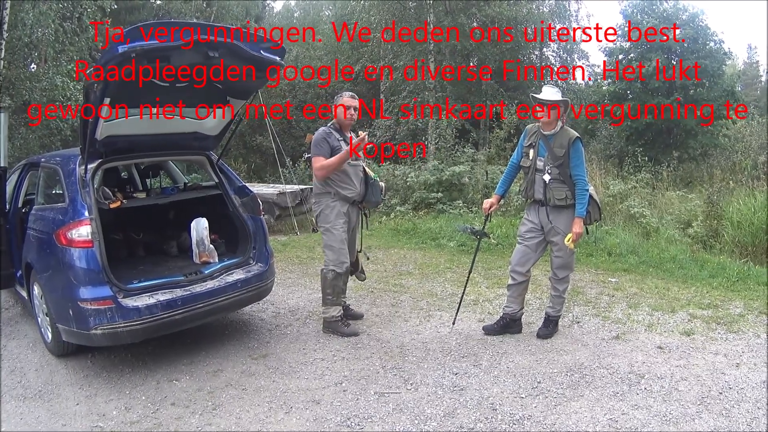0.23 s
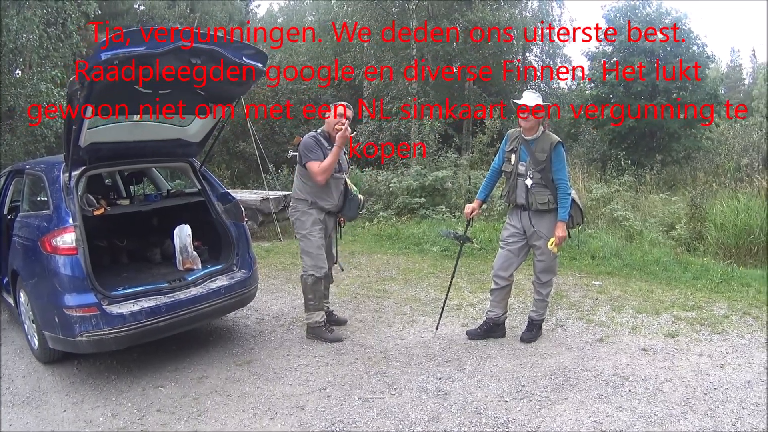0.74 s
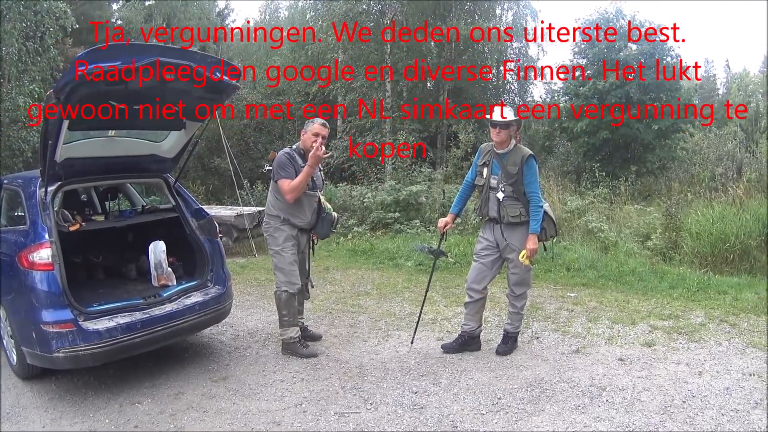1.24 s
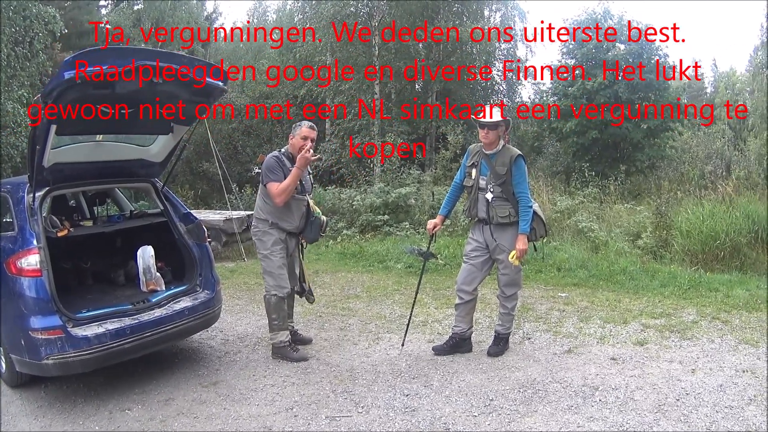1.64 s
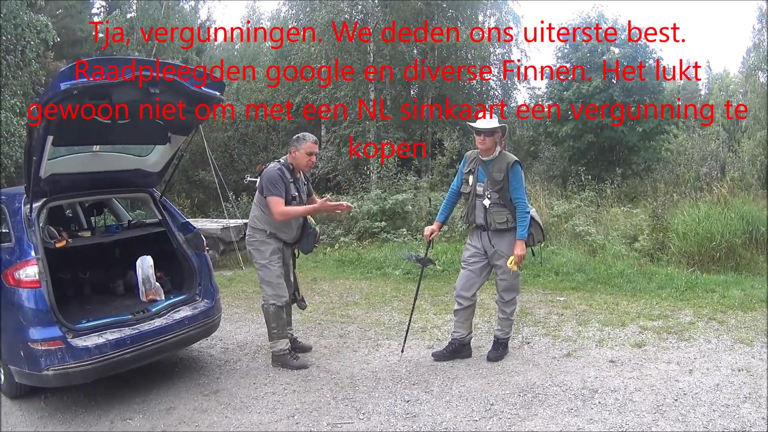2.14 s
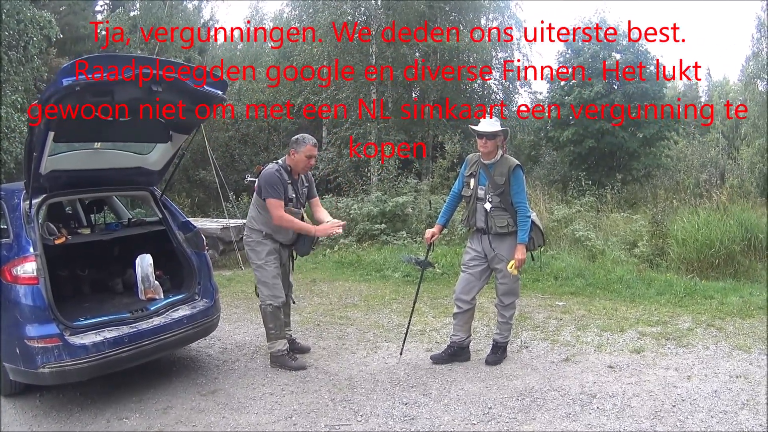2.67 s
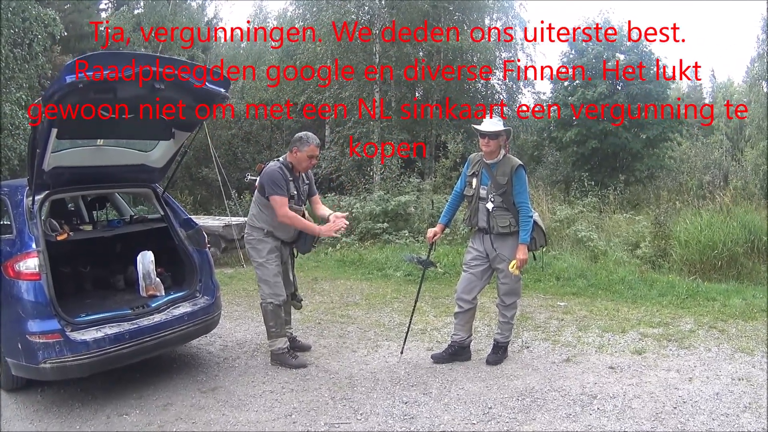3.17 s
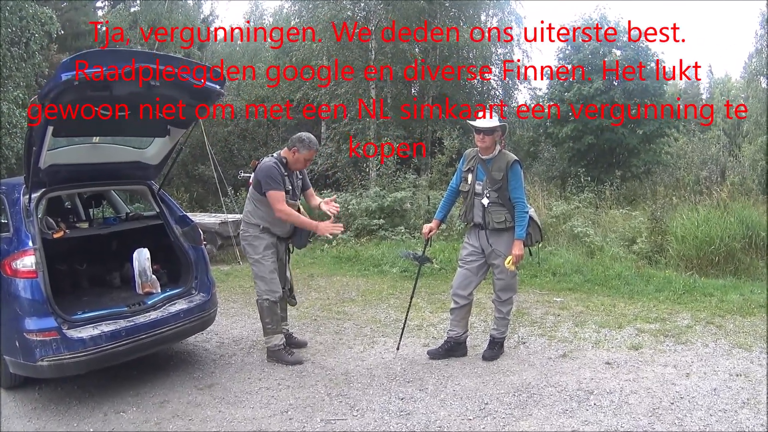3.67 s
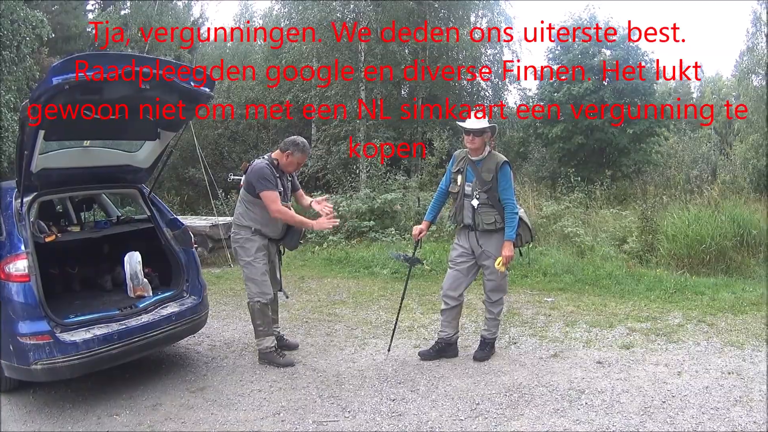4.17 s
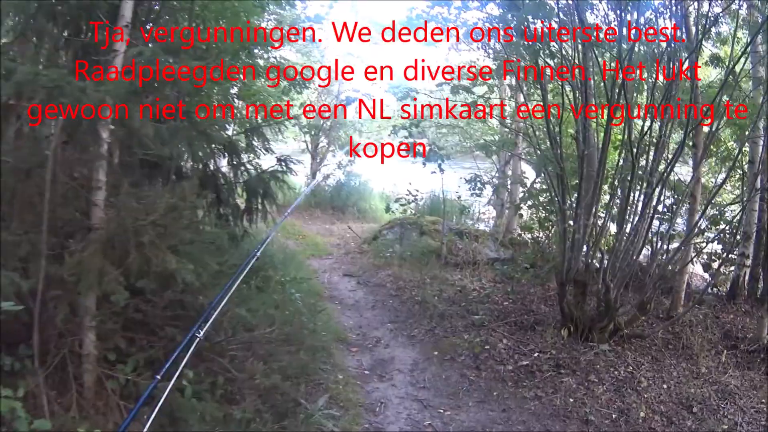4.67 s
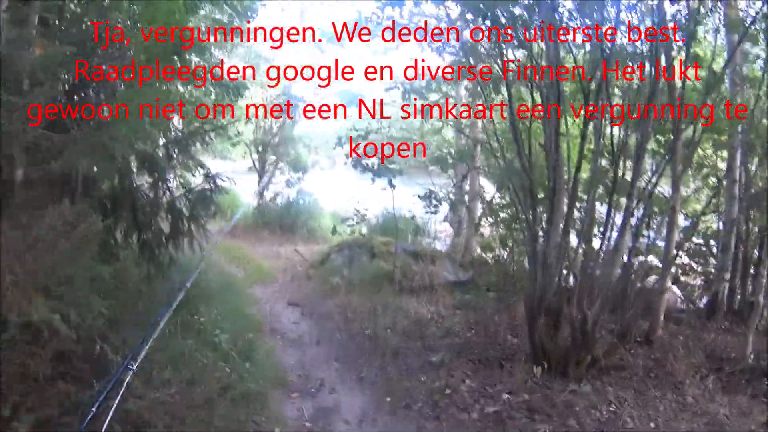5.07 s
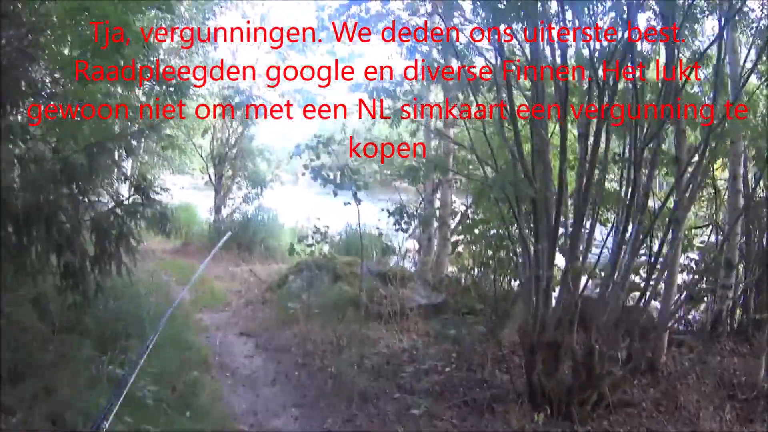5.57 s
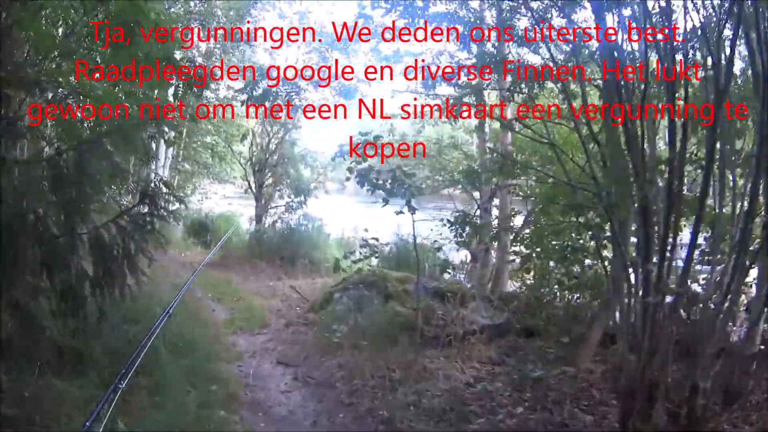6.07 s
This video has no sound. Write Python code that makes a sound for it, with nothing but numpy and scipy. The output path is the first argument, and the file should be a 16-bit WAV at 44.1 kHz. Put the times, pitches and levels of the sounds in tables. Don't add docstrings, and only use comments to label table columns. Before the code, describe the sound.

Hands slap and knock on a small plastic housing with clicks, creaks and rustling, while a river rushes steadily in the background outdoors.

```python
import sys
import numpy as np
from scipy import signal
from scipy.io import wavfile

SR = 44100
rng = np.random.default_rng(int(sys.argv[2]) if len(sys.argv) > 2 else 0)


def wrap_up_sound(samples):
    columns = np.atleast_2d(samples).T
    tamed = np.clip(columns, -1, 1)
    steps = np.round(tamed * 32767).astype(np.int16)
    wavfile.write(sys.argv[1], SR, steps)


def elevation(decibels):
    levels = np.asarray(decibels, float)
    return 10 ** (levels / 20)


N = 278271
OPPOSITE = np.array([[1], [-1]])


def rms_one(x):
    return x / np.sqrt(np.mean(x ** 2) + 1e-20)


def over_time(points):
    times, levels = np.transpose(points)
    return np.interp(np.arange(N) / SR, times, levels)


def at_hz(points, hz):
    point_hz, values = np.transpose(points)
    return np.interp(np.log(hz), np.log(point_hz), values)


def band(x, low_hz, high_hz, count=1):
    sos = signal.butter(2, [low_hz, min(high_hz, .45 * SR)], "band", fs=SR, output="sos")
    return signal.sosfilt(np.tile(sos, (count, 1)), x)


def steep(x, low_hz, high_hz):
    return band(x, low_hz, high_hz, count=2)


def drift(rate_hz):
    r = np.exp(-80 * np.pi * rate_hz / SR)
    white = rng.standard_normal(N // 40 + 2002)
    slow = signal.lfilter([1], [1, -2 * r, r * r], white)[2000:]
    return np.interp(np.arange(N) / 40, np.arange(len(slow)), rms_one(slow))


def ring(x, hz, t60):
    r = elevation(-60 / (t60 * SR))
    w = 2 * np.pi * hz / SR
    return signal.lfilter([0, np.sin(w)], [1, -2 * r * np.cos(w), r * r], x)


def contact_noise(count, length, wide):
    n = rng.standard_normal((count, 2, length))
    return n[:, :1] + wide * n[:, 1:] * OPPOSITE


def burst(noise, t60, rise_s, snap=0.0, click=0.0):
    t = np.arange(noise.shape[-1]) / SR
    rise_s = np.clip(rise_s, .0002, .015)
    fall = elevation(-60 * np.maximum(t - rise_s, 0) / np.clip(t60, .004, .9))
    lean = 1 + noise[:, :1] - noise[:, :1].mean()
    contact = click * lean * (np.arange(len(t)) == int(rise_s * SR))
    return noise * (1 - np.exp(-(t / rise_s) ** 2)) * (fall + snap * fall ** 5) + contact


def add(out, s, sound, peak_db):
    i = int(s * SR)
    sound = sound[:, :N - i] * elevation(peak_db) / np.max(np.abs(sound.mean(axis=0)))
    out[:, i:i + sound.shape[1]] += sound


def housing(x):
    # (frequency [Hz], width [Hz], lift [dB])
    cavity_modes = [(1320, 119, 12.5), (1640, 320, 4), (2400, 306, 7), (4600, 1200, 2)]
    out = x
    for hz, width_hz, db in cavity_modes:
        r = np.exp(-np.pi * width_hz / SR)
        numerator = (1 - r * r) / 2 * np.array([1, 0, -1])
        denominator = [1, -2 * r * np.cos(2 * np.pi * hz / SR), r * r]
        out = out + (elevation(db) - 1) * signal.lfilter(numerator, denominator, out)
    return out


def slaps():
    # (time [s], pocket peak [dB], t60 [s], airy top [dB re peak], bright crack [dB re peak])
    slap_events = [(0.2638, -24.5, 0.058, -52, -0.5), (2.365, -19, 0.019, -14.5, 3.5),
                   (2.7118, -25.5, 0.014, -11, 7.5), (2.966, -19, 0.013, -19, -8),
                   (3.1965, -11, 0.017, -18, -5), (3.4087, -17, 0.026, -16, -4.5),
                   (3.6521, -12.5, 0.0067, -17, -4), (3.891, -12.5, 0.02, -16.5, -1.5),
                   (4.0327, -14.5, 0.031, -50, -12.5), (4.148, -10, 0.013, -24.5, -6.5),
                   (4.4177, -21, 0.016, -13.5, 0)]
    pocket_hz = [2450, 2450, 2750, 2510, 2810, 2700, 2600, 2860, 2470, 2910, 2630]
    # (delay [s], level [dB])
    reflections = [
        (.006, -20),
        (.013, -22),
        (0.019, -29.5),
    ]
    trees_t60 = 0.67
    out, tails = np.zeros((2, N)), np.zeros((2, N))
    noise = contact_noise(len(slap_events), 4000, wide=0.12)
    scatter = contact_noise(len(slap_events), 16000, wide=0.27)
    for (s, db, t60, top_db, bright_db), hz, n, far in zip(slap_events, pocket_hz, noise, scatter):
        crack = burst(n, 1.9 * t60, 0.0012, snap=3.0, click=11.0)
        pocket = steep(crack, 0.896 * hz, 1.09 * hz)
        add(out, s, pocket + 0.41 * band(crack, 1950, 3110), db)
        add(out, s, steep(crack, 3050, 6210), db + bright_db + 7.5)
        air = burst(n, 1.17 * t60, 0.0017, click=3.7)
        add(out, s, steep(air, 12200, 19000) + 1.93 * band(air, 7360, 9300), db + top_db + 4.5)
        brush = burst(n[:, ::-1], .02, .004)
        add(out, s - .004, steep(brush, 1800, 7000), db + bright_db - 12)
        tail = burst(far, trees_t60, 0.0024, snap=1.7)
        tail = steep(tail, 3000, 7000) + 0.36 * steep(tail, 840, 1520)
        add(tails, s, tail, db + max(bright_db, -6) - 19)
        high_tail = burst(far, 0.54 * trees_t60, .003)
        add(tails, s, steep(high_tail, 5800, 14500), db + top_db - 23.5)
    direct = out.copy()
    for delay_s, db in reflections:
        lag = int(delay_s * SR)
        out[:, lag:] += elevation(db) * band(direct[::-1, :-lag], 800, 7000)
    return out + housing(tails)


def body_contacts(events, rise_s, rough, snap, ringing):
    out = np.zeros((2, N))
    noise = contact_noise(len(events), 4000, wide=0.12)
    for (s, db, hz, t60, dull_db, bright_db), n in zip(events, noise):
        contact = burst(n, rough * t60, rise_s, snap, click=7.6 * snap)
        mode = ring(contact, hz, np.clip(ringing * t60, .004, .2))
        lean = elevation(-2.0 * np.log2(hz / 1150) * OPPOSITE)
        add(out, s, lean * steep(mode, 0.58 * hz, 1.49 * hz), db)
        shake = burst(n[::-1], 1.18 * t60, rise_s, snap)
        add(out, s, steep(shake, 374, 1256) * elevation(0.6 * OPPOSITE), db + dull_db - 5.0)
        add(out, s, steep(shake, 1490, 2060), db + bright_db + 1.0)
    return out


def blows_and_knocks():
    # (time [s], peak [dB], main ring [Hz], dull part [dB re peak], bright part [dB re peak])
    blows = [(0.265, -17, 1477, -7, -25), (2.365, -20, 1330, -5, -6), (2.712, -20, 1730, -19, -8),
             (2.967, -23.5, 1350, -3.5, 0.5), (3.412, -19.5, 1226, 1, -9), (3.894, -14, 1357, 3, -17),
             (4.0344, -8.5, 1466, -4, -10.5), (4.215, -25.5, 1360, 0, -20), (4.42, -30, 1260, 8, 3),
             (5.0046, -6.5, 1275, -1.5, -11.5), (6.242, -22, 722, -20, -2), (6.263, -9, 1580, -4, -29)]
    # (time [s], peak [dB], main ring [Hz], dull part [dB re peak])
    soft_knocks = [
        (0.725, -36.5, 1760, 4),
        (4.593, -34, 816, -4),
        (5.509, -31.5, 1440, 4),
        (5.682, -34, 1320, 7),
        (6.06, -32, 1400, 8.5),
        (6.222, -30, 640, -16),
    ]
    events = [(s, db, hz, .05, dull_db, bright_db) for s, db, hz, dull_db, bright_db in blows]
    events += [(s, db, hz, 56 / hz, dull_db, -5) for s, db, hz, dull_db in soft_knocks]
    return body_contacts(events, rise_s=0.00061, rough=0.99, snap=2.4, ringing=0.5)


def rubs():
    # (time [s], peak [dB], main ring [Hz], dull part [dB re peak])
    scrapes = [(0.779, -43, 1340, 2), (0.953, -36.5, 1280, -12), (0.985, -39, 1280, -6),
               (1.75, -39, 1630, -18), (2.41, -24.5, 1330, 1), (2.435, -21.5, 1320, -6),
               (2.52, -36, 1470, -2), (3.004, -43.5, 840, 3), (3.825, -45, 597, 12.5),
               (4.272, -53, 1330, 18.5), (4.63, -38, 849.3, 0), (4.93, -26.5, 1050, -27)]
    events = [(s, db, hz, 60 / hz, dull_db, -9) for s, db, hz, dull_db in scrapes]
    return body_contacts(events, rise_s=0.0014, rough=1.0, snap=0, ringing=0.69)


def thumps():
    # (time [s], peak [dB], centre [Hz])
    bumps = [(0.714, -39, 149), (0.81, -54, 172), (0.875, -33, 230), (1.665, -39, 380), (1.764, -44.5, 167),
             (2.06, -52, 241), (2.188, -31, 218), (2.402, -28, 416), (2.439, -33.5, 151),
             (2.606, -41.5, 134), (2.955, -38, 390), (3.188, -45.5, 125), (3.278, -52, 340),
             (3.402, -30.5, 440), (3.473, -33.5, 177), (3.473, -45, 323.8), (1.4, -52, 260),
             (2.52, -38.5, 304), (3.783, -44, 170), (3.88, -22, 460), (4.036, -25, 450),
             (4.217, -37.5, 450), (4.414, -35, 390), (4.582, -41, 474), (5.199, -54, 150),
             (4.968, -35, 161), (5.137, -45, 160), (5.468, -39.5, 171), (5.502, -35, 133),
             (5.578, -41, 177), (5.675, -42, 148), (6.058, -45, 147), (6.209, -34.5, 154)]
    # (time [s], peak [dB], centre [Hz])
    pushes = [(0.714, -51, 94.2), (0.881, -67, 88), (1.758, -51, 86.1), (2.061, -53, 91.54),
              (2.191, -70, 94.2), (2.405, -58, 59.2), (2.549, -50, 70.0), (3.191, -55, 94.2),
              (3.465, -57, 94.2), (3.779, -64, 94.2), (4.412, -56, 70.04), (4.753, -51, 94.2),
              (4.919, -47, 94.2), (5.5, -49, 94.2), (5.637, -50.5, 94.2), (5.764, -53, 94.2),
              (5.902, -55, 88.8), (6.186, -57, 94.2)]
    events = bumps + pushes
    out = np.zeros((2, N))
    for (s, db, hz), n in zip(events, contact_noise(len(events), 8000, wide=0.1)):
        push = burst(n, 1.17 * 0.066, 0.0019)
        add(out, s + 0.00718, band(push, 0.67 * hz, 1.65 * hz), db)
    return out


def shell(clicks, hz, upper_db, sides):
    # (frequency [Hz], t60 [s], level [dB])
    shared_modes = [(743, 0.0026, -32), (1330, 0.02, -10.5), (1760, 0.0099, -0.5)]
    soft = signal.sosfilt(signal.butter(2, 2300, fs=SR, output="sos"), clicks)
    modes = [(hz, 0.015, -upper_db)] + shared_modes
    out = 0
    for (mode_hz, t60, db), side in zip(modes, sides - sides.mean()):
        out = out + elevation(db + 3.1 * side * OPPOSITE) * ring(soft, mode_hz, np.clip(t60, .002, .1))
    return steep(out, 660, 2530)


def taps():
    # (time [s], peak [dB], main ring [Hz], main ring below upper modes [dB])
    thin_taps = [(0.831, -28, 900, 12), (0.884, -30.5, 830, -18), (1.768, -30, 1330, -12),
                 (1.845, -23.5, 1280, 3), (1.859, -42, 1380, -1.5), (1.881, -23, 1310, 5),
                 (1.899, -26, 1320, 3), (1.913, -30, 1230, 10), (1.924, -35, 1280, -3),
                 (1.937, -42, 1350, -1.5), (2.201, -21.5, 920, -11), (2.538, -13.5, 1340, 14),
                 (2.599, -23.5, 1450, 11), (2.662, -42, 1390, -9), (2.697, -32.5, 1330, -4),
                 (3.59, -29.5, 1360, 4), (3.668, -27.5, 1320, -5), (3.734, -30, 1270, 10),
                 (3.799, -25, 1310, 11), (4.701, -23.5, 1320, 5), (4.856, -19.5, 1330, 8),
                 (4.93, -22.5, 1050, 7), (4.961, -20, 1230, -6), (5.106, -16, 1310, 3),
                 (5.117, -17, 1550, 3), (5.139, -4, 1010, 6), (5.177, -12, 954, 3), (5.187, -12, 1000, 1.5),
                 (5.238, -24.5, 1330, 5), (5.573, -31, 1270, 9), (5.883, -29, 1300, 5),
                 (5.94, -11.5, 984, 1.5), (5.95, -17.5, 1320, 4), (5.981, -27, 1320, 7),
                 (5.986, -29, 1390, 2), (6.001, -23, 1430, 4), (6.015, -31, 1350, 10),
                 (6.147, -28.5, 1330, 1), (6.243, -9.5, 670, -10), (6.262, -4, 1290, 0),
                 (6.265, -10, 1260, -8),
                 (5.238, -28, 1290, 10),
        (5.357, -28, 1380, 6),
        (5.51, -35, 1320, 6),
        (5.539, -20, 1320, 15),
        (5.573, -27, 1280, -6),
        (5.678, -33, 1320, 2),
        (5.723, -26, 1500, -1.5),
        (5.737, -30, 1300, 16),
        (5.87, -25.5, 1330, 3),
        (5.882, -27, 1250, 14),
    ]
    events = thin_taps
    impulse = np.eye(1, 1500)[0]
    out = np.zeros((2, N))
    for (s, db, hz, upper_db), sides in zip(events, rng.standard_normal((len(events), 4))):
        add(out, s + 0.00081, shell(impulse, hz, upper_db, sides), db)
    return out


def creaks():
    # (time [s], length [s], peak [dB], slip rate [1/s], main ring [Hz])
    creak_events = [(0.83, 0.021, -33.5, 430, 840), (0.898, 0.02, -31.5, 300, 850),
                    (0.922, .016, -34.5, 350, 1220), (1.656, 0.037, -38.5, 360, 830),
                    (1.735, 0.043, -29, 520, 800), (1.812, 0.023, -34.5, 380, 1310),
                    (2.476, 0.02, -25.5, 317, 1090), (2.567, 0.019, -28, 290, 1220),
                    (2.615, 0.013, -26.5, 530, 1420), (4.975, 0.027, -23, 286, 1180),
                    (5.009, 0.012, -26, 440, 810), (5.039, 0.0091, -26, 410, 836),
                    (5.053, 0.0064, -25.5, 380, 700), (5.147, 0.013, -12, 920, 1015),
                    (6.265, 0.018, -12.5, 410, 740)]
    out = np.zeros((2, N))
    draws = rng.standard_normal((len(creak_events), 2, 60))
    for (s, length, db, per_s, hz), (gaps, sizes) in zip(creak_events, draws):
        t = np.cumsum(np.exp(70 / per_s * gaps) / per_s) - 1 / per_s
        within = t < length
        slips = np.zeros(4000)
        slips[(t[within] * SR).astype(int)] = elevation(3.0 * sizes - 8.2 * t / length)[within]
        add(out, s, shell(slips, hz, -6.5, sizes[-4:]), db)
    return out


def rings():
    # (time [s], peak [dB], frequency [Hz], t60 [s])
    hollow_parts = [(0.2667, -12, 1520, .045), (0.2802, -25, 1300, 0.074), (4.0405, -25, 520, .09),
                    (4.0505, -32, 2000, .03), (4.1592, -27, 2880, .035), (2.7135, -20, 1900, .02),
                    (4.0602, -31, 440, 0.053), (4.0485, -28, 950, .04), (0.9005, -35, 300, .04),
                    (0.8845, -32, 1100, .015), (0.9065, -33, 1000, .02), (6.2425, -22, 570, .04),
                    (3.8305, -38, 900, .04), (4.4195, -26, 480, .04), (4.217, -38.5, 530, 0.12),
                    (5.006, -21.5, 780, 0.033), (5.018, -28, 780, .04), (5.041, -27, 790, .04),
                    (5.141, -13.5, 960, .045), (5.152, -18, 1760, 0.03), (5.161, -26, 1600, 0.017),
                    (5.141, -10.5, 1790, 0.034), (5.201, -21, 1800, 0.018), (3.892, -16, 1280, 0.034),
                    (2.366, -20.5, 2380, 0.032), (3.418, -27, 1400, 0.054), (3.198, -27, 1380, .03),
                    (3.655, -30, 1346, .025), (3.653, -18, 2310, 0.017), (0.2705, -31.5, 1200, .3),
                    (3.8905, -15, 2390, 0.023), (4.214, -35, 3700, .012), (4.216, -34, 3100, .015),
                    (6.263, -16.5, 1020, 0.059)]
    out = np.zeros((2, N))
    for (s, db, hz, t60), n in zip(hollow_parts, contact_noise(len(hollow_parts), 6000, wide=0.12)):
        mode = ring(burst(n, 0.008, 0.001, click=6.1), hz, np.clip(t60, .005, .2))
        add(out, s, band(mode, 0.72 * hz, 1.43 * hz), db)
    return out


def latch():
    # (frequency [Hz], t60 [s], peak [dB])
    metal_modes = [(1210, 0.33, -34), (1330, 0.053, -23), (1464, 0.021, -13.5), (2350, 0.048, -21.5),
                   (4290, 0.1, -35), (5640, 0.069, -33), (5940, 0.049, -27.5)]
    struck_s = .2655
    out = np.zeros((2, N))
    n = contact_noise(1, 16000, wide=0.24)[0]
    strike = burst(n, 0.015, 0.0014, click=1.7)
    for hz, t60, db in metal_modes:
        add(out, struck_s, band(ring(strike, hz, t60), 0.86 * hz, 1.04 * hz), db)
    sizzle = burst(n, 0.44, 0.0091)
    add(out, struck_s, steep(sizzle, 3950, 4700) + steep(sizzle, 5100, 6600), -37)
    return out


def cracks(events, rise_s, width):
    out = np.zeros((2, N))
    noise = contact_noise(len(events), 3000, wide=0.23)
    for (s, db, hz, t60, top_db), n in zip(events, noise):
        crack = burst(n, 5.0 * t60, rise_s, snap=2.6, click=4.6)
        broad = steep(crack, hz / width, max(5000, hz * 1.476))
        add(out, s, broad + 1.5 * steep(crack, 0.884 * hz, 1.14 * hz), db)
        air = burst(n, 1.0 * t60, rise_s, click=2.3)
        add(out, s, steep(air, 11000, 22000) + 0.89 * band(air, 8300, 9800), db + top_db + 4.5)
    return out


def gear():
    # (time [s], peak [dB])
    buckle_ticks = [(0.4492, -44), (0.5302, -33.5), (0.7027, -38.5), (0.8305, -45), (1.475, -34),
                    (1.8147, -37), (1.8254, -47), (1.8457, -36.5), (1.858, -40), (1.881, -38),
                    (1.8996, -42), (2.539, -27.5), (2.602, -37.5), (4.7, -35), (4.9427, -33), (4.997, -31),
                    (5.095, -16), (5.139, -29), (5.4276, -32.5), (5.951, -32), (6.1341, -29.5),
                    (6.1767, -40), (6.232, -29.5)]
    # (time [s], peak [dB], centre [Hz], airy top [dB re peak])
    rod_clicks = [(2.816, -31, 5500, -33), (3.113, -29.5, 5640, -22), (3.284, -29, 6200, -24),
                  (3.7797, -36, 6300, -19), (4.0144, -28, 5900, -20), (4.117, -43, 6300, -19),
                  (4.282, -23.5, 5700, -48), (4.505, -32, 5760, -27), (5.0704, -13, 4630, -30),
                  (5.1055, -26, 4140, -12), (5.5666, -27, 5230, -13), (6.0406, -39, 4970, -8),
                  (6.206, -30, 5100, -15), (5.331, -43, 4200, -25), (5.46, -35, 4900, -25),
                  (5.533, -39, 3800, -25), (5.667, -39, 4000, -27), (5.699, -31, 4600, -25),
                  (5.238, -35, 4550, -23), (2.446, -33, 3640, -25), (2.421, -27, 4800, -25),
                  (4.856, -35, 4830, -25)]
    # (time [s], peak [dB], centre [Hz], t60 [s], airy top [dB re peak])
    scuffs = [(2.4035, -29, 2190, 0.0081, -28), (2.409, -19.5, 2600, 0.011, -23),
              (2.412, -17.5, 2400, 0.021, -32), (2.4345, -18.5, 2500, 0.0064, -20),
              (2.439, -19, 2350, 0.02, -25), (1.973, -37, 2630, 0.006, -30),
              (5.071, -16.5, 2300, 0.006, -44), (5.0855, -17, 2700, 0.005, -17),
              (5.1158, -19, 2820, 0.0052, -54), (5.2, -18.5, 2790, 0.0068, -25),
              (5.3572, -27, 2300, 0.017, -47), (5.5398, -24, 2340, 0.0035, -35),
              (5.678, -21, 2620, 0.0031, -18), (5.736, -17, 2110, 0.0083, -26)]
    small = [(s, db, 4570, 0.0024, -29) for s, db in buckle_ticks]
    small += [(s, db, hz, 0.0039, top_db) for s, db, hz, top_db in rod_clicks]
    return cracks(small, rise_s=0.000674, width=1.7) + cracks(scuffs, rise_s=0.00077, width=1.34)


def swishes():
    # (time [s], peak [dB], t60 [s])
    sleeves = [
        (2.953, -31.5, 0.038),
        (3.004, -39.5, 0.21),
        (3.558, -42, 0.19),
        (6.195, -33, 0.14),
    ]
    out = np.zeros((2, N))
    for (s, db, t60), n in zip(sleeves, contact_noise(len(sleeves), 6000, wide=0.17)):
        cloth = steep(burst(n, t60, 0.0065), 2500, 7100)
        add(out, s, cloth + 0.053 * band(burst(n, t60, .005), 8000, 15000), db)
    return out


def creeping(low_hz, high_hz, per_s, spread_db, wide):
    sizes = elevation(spread_db * np.minimum(rng.exponential(1, (2, N)), 4)) * rng.choice([-1, 1], (2, N))
    grains = sizes * (rng.random((2, N)) < per_s * elevation(5 * drift(20)) / SR)
    mid, side = steep(grains + 1e-18, low_hz, high_hz)
    return rms_one(mid + wide * side * OPPOSITE)


def handling():
    # (time [s], rustle level [dB])
    effort = [(0.0, -56), (0.68, -57), (0.9, -48), (1.05, -60), (1.75, -54), (2.3, -55), (2.47, -45),
              (2.75, -54), (3.7, -53), (4.32, -58.5), (4.62, -52.5), (4.8, -47), (5.06, -37.5), (5.25, -49),
              (5.55, -43), (5.78, -48.5), (6.18, -43.5), (6.31, -38)]
    effort_db = over_time(effort)
    rumble_db = -62 + 1.5 * (effort_db + 49.5)
    rustle = elevation(effort_db) * creeping(465, 2070, per_s=1500, spread_db=2.2, wide=0.43)
    rumble = elevation(rumble_db) * creeping(104, 237, per_s=500, spread_db=2.5, wide=0.064)
    return rustle + rumble


def river():
    # (time [s], level [dB])
    flow = [
        (0, -55),
        (1.5, -53),
        (2.3, -53.5),
        (4.666, -53),
        (4.672, -48),
        (5.05, -46.5),
        (5.8, -47),
        (6.31, -46.5),
    ]
    # (frequency [Hz], density [dB per Hz])
    spectrum = [(250, -11.5), (420, -11), (640, -15.5), (1030, -19.5), (1400, -7.5), (1950, -14),
                (2500, -6.5), (3400, -15.5), (4700, -13.5), (6400, -25), (8500, -45), (12000, -65)]
    # (frequency [Hz], likeness [0 to 1])
    likeness = [(60, 0.95), (130, 0.43), (290, 0.95), (640, 0.087), (1410, 0.96), (3100, 0.67),
                (6820, 0.89), (15000, 0.61)]
    flow_db = over_time(flow)
    tilt_db = 0.12 * (flow_db - flow_db.mean())
    out, together = 0, drift(2.0)
    edges = 198 * 2 ** np.arange(0, 6.1, 1 / 3)
    white = rng.standard_normal((2, 2, N))
    for k, (low, high) in enumerate(zip(edges, edges[1:])):
        mid, side = band(white[k % 2], low, high)
        hz = np.sqrt(low * high)
        alike = np.clip(at_hz(likeness, hz), 0, 1)
        flicker_db = 1.32 * (.3 * together + drift(13.0))
        gain = elevation(at_hz(spectrum, hz) + tilt_db * max(np.log2(hz / 2400), 0) + flicker_db)
        out = out + gain * (np.sqrt(1 + alike) * mid + np.sqrt(1 - alike) * side * OPPOSITE)
    out = housing(out)
    reference = band(out.mean(axis=0), 2200, 7000)
    return elevation(flow_db) * out / np.sqrt(np.mean(reference ** 2))


def capsule_hiss():
    # (low edge [Hz], high edge [Hz], level [dB])
    noise_bands = [(38, 69, -80.5), (6600, 11900, -83.5), (12760, 18100, -73)]
    white = contact_noise(1, N, wide=0.13)[0]
    hiss = sum(elevation(db) * rms_one(steep(white, low_hz, high_hz)) for low_hz, high_hz, db in noise_bands)
    return signal.sosfilt(signal.cheby2(10, 40, 15900, fs=SR, output="sos"), hiss)


def scene():
    hands = slaps() + blows_and_knocks() + rubs() + thumps()
    plastic_and_metal = taps() + creaks() + rings() + latch()
    return hands + plastic_and_metal + gear() + swishes() + handling() + river()


def low_pass(x):
    return signal.sosfilt(signal.butter(12, 16810, fs=SR, output="sos"), x)


def record(dry):
    level_db = 20 * np.log10(np.abs(dry).max(axis=0) + 1e-9)
    fall = 250 * np.arange(N) / SR
    held_db = np.maximum.accumulate(level_db + fall) - fall
    duck_db = signal.lfilter([.01], [1, -.99], -.4 * np.maximum(held_db + 12.0, 0))
    mix = (dry + capsule_hiss()) * elevation(duck_db)
    mix = signal.sosfilt(signal.cheby2(12, 70, 17000, fs=SR, output="sos"), mix)
    return low_pass(mix)


dry = scene()
out = record(dry)
wrap_up_sound(out)
```